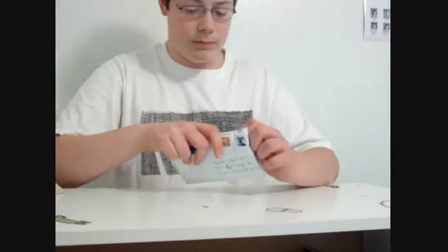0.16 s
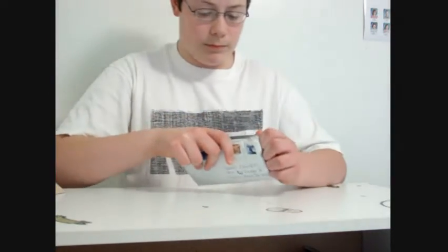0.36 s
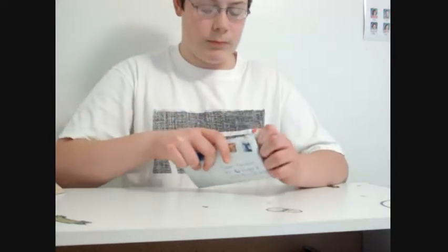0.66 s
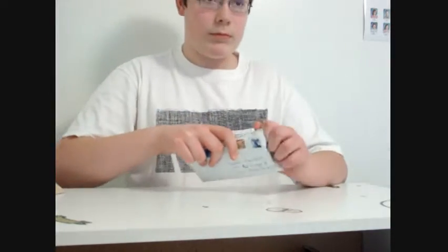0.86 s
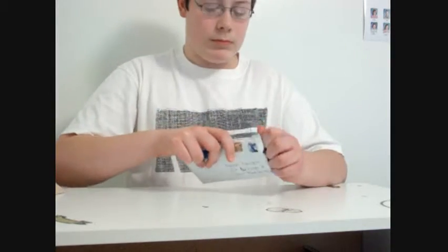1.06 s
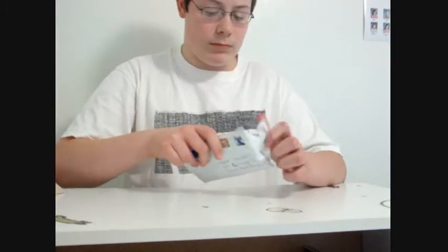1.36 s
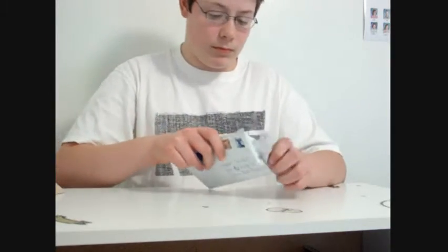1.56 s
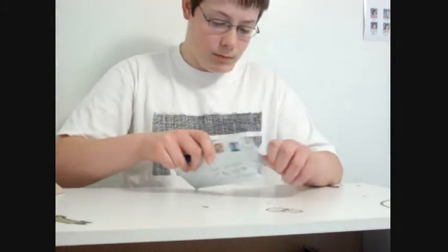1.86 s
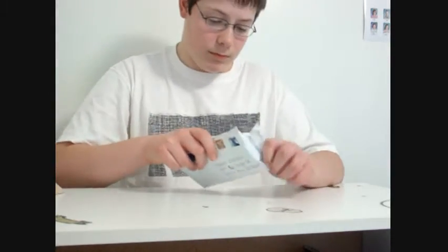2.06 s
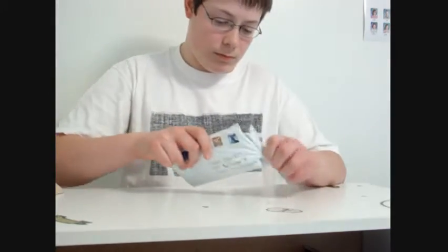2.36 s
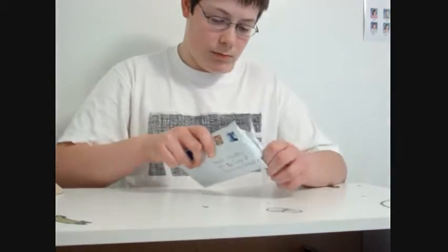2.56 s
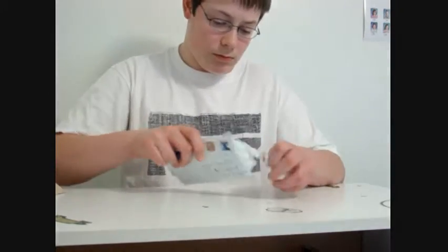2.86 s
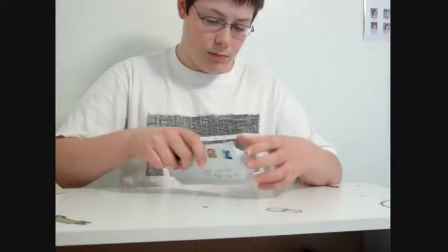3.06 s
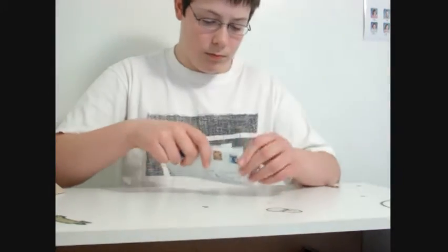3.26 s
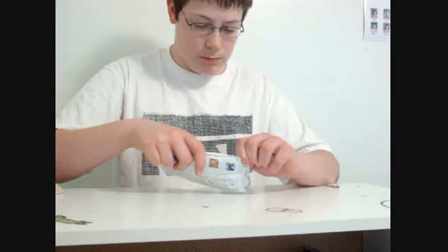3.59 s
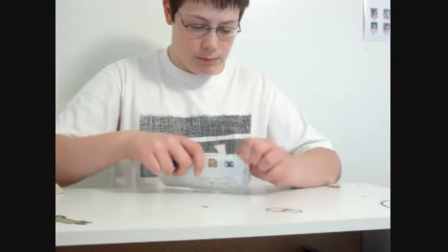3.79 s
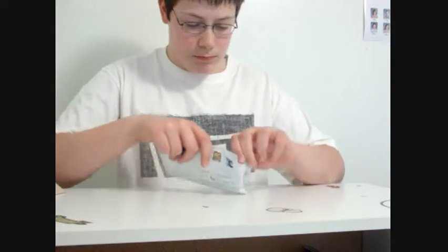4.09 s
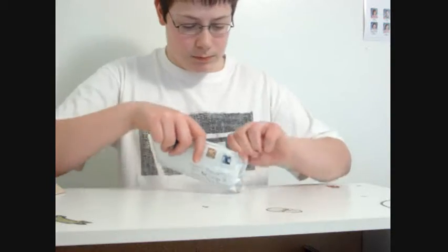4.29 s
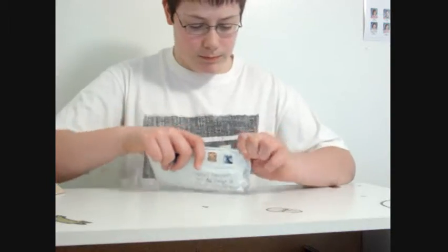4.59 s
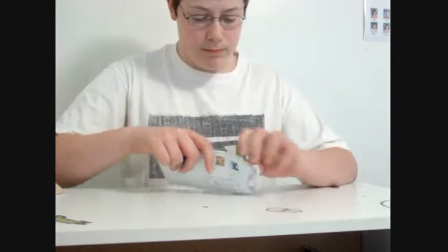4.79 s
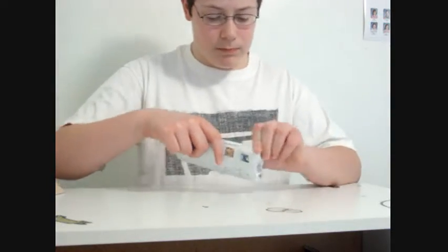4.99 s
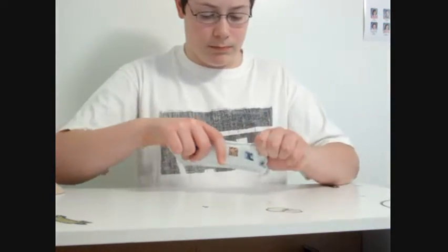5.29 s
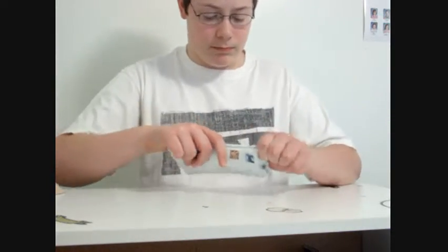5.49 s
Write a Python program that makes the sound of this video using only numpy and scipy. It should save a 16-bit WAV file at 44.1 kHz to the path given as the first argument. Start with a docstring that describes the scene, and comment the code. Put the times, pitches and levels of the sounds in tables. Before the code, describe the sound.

Close paper crackling, one quick sharp tear of an envelope, then more rustling, snaps and soft pops in a quiet room.

```python
"""A small quiet room, a stiff paper envelope worked open above a desk, close to a small microphone.
First the paper creases and snaps as it buckles in the hands, and its wide panels flip with a pop.
At 1.2 s one short loud rip of parting fibres takes the end off; its sharpest snaps hit the limiter hard.
A fingertip squeaks, then fingers rustle in the pocket and tug at the contents, with more snaps and pops.
The desk and near walls answer throughout, over a faint hush; the narrow band ends near 10 kHz."""
import sys
import numpy as np
from scipy import signal
from scipy.fft import rfft, irfft, next_fast_len
from scipy.io import wavfile
from scipy.ndimage import uniform_filter1d, minimum_filter1d, map_coordinates

SR = 44100
rng = np.random.default_rng(int(sys.argv[2]) if len(sys.argv) > 2 else 0)


def store_wav(level_fs):
    """Save 16-bit WAV to argv[1]."""
    pcm = np.round(np.clip(np.atleast_2d(level_fs), -1, 1) * 32767)
    wavfile.write(sys.argv[1], SR, pcm.T.astype(np.int16))


N = 248724

# All levels are relative; brightness is the level of the fibres over that of the sheet's body.
# The tear running along the fold. Each row: time in seconds, force in dB, brightness in dB.
TEAR = [(1.187, -48, 0), (1.194, -23, -2), (1.212, -16.5, 2), (1.228, -13, 4), (1.241, -10, -3),
        (1.257, -11.5, -2), (1.277, -17.5, -2), (1.287, -30, -4), (1.31, -48, -4)]
# The sheet ringing as it tears. Each row: frequency in Hz, width in Hz, level in dB.
SHEET_MODES = [(600, 90, -11), (860, 80, -8), (1380, 70, 0), (1630, 90, -1), (1860, 110, -1),
               (2240, 120, -4), (2840, 110, -6), (3080, 90, -5), (3380, 90, -6), (3730, 110, -8)]
# Paper buckling. Each row: time in seconds, tick, crackle and brightness in dB, crackle t60 in seconds.
BUCKLES = [(0.0873, -18.5, -24.5, 7, 0.12), (.12, -38, -32, 4, 0.2), (0.189, -40, -22, 2, .12),
           (0.329, -19.5, -29.5, 4, 0.086), (.394, -31.5, -34, 5.5, 0.1), (.468, -45, -36, 17, 0.045),
           (.559, -17.5, -24.5, 9, 0.11), (.866, -45, -32.5, -6, 0.034), (.926, -21, -30.5, 3, 0.15),
           (1.116, -29, -30, 15, 0.081), (1.1997, 7, -12, -1, 0.051), (1.206, -3.5, -28, -6, 0.034),
           (1.2175, 16.5, -26, 11, 0.017), (1.3616, -20.5, -25, 4.5, 0.057),
           (1.4678, -16.5, -23, -2.5, 0.058), (1.61, -50, -31, 4, 0.17), (1.752, -48, -35.5, -10, 0.033),
           (1.82, -25, -14, 16, 0.036), (1.848, -39, -20.5, 14, 0.08), (1.901, -18.5, -18, 1.5, 0.075),
           (1.908, -15, -12, 9, 0.1), (1.988, -45, -28.5, 2, 0.032), (2.015, -40, -15, 8, 0.066),
           (2.179, -44, -29.5, 3, 0.23), (2.206, -21, -23.5, 3, .1), (2.276, -45, -23.5, 4.5, 0.16),
           (2.423, -38, -27.5, 14, 0.082), (2.556, -29, -29, 1.5, 0.079), (2.687, -24, -29.5, -4.5, 0.066),
           (2.714, -35, -26, -1.5, 0.13), (2.764, -38, -33, 5, 0.26), (2.895, -18, -15, 6.5, 0.13),
           (3.424, -44, -22.5, 2, 0.037), (3.447, -37, -22.5, 13, 0.078), (3.669, -15.5, -13.5, -8, 0.031),
           (3.751, -31.5, -40, -1, 0.3), (3.819, -35, -32, 5.5, 0.14), (3.96, -35, -25, 18, 0.065),
           (4.105, -50, -28.5, -4, 0.079), (4.129, -22, -31.5, 1.5, 0.25), (4.31, -15, -19.5, -5.5, 0.067),
           (4.333, -37, -24.5, -2, 0.13), (4.584, -38, -35.5, 0, 0.13), (5.184, -32, -28, -1, 0.046),
           (5.223, -31, -32, 1.5, 0.084), (5.316, -27, -26.5, 20, .055), (5.423, -29, -13, -1, 0.037),
           (5.428, -12.5, -18, -2.5, 0.14), (5.494, -45, -28, 4, 0.025), (5.536, -30, -18.5, 1.5, 0.053),
           (5.583, -17, -23.5, -5.5, 0.065), (5.632, -19, -22.5, 1, 0.19)]
# A wide panel of the envelope flipping. Each row: time in seconds, level in dB, pitch in Hz.
PANEL_FLIPS = [(.188, -33.5, 550), (0.559, -45, 706), (.824, -45, 530), (.866, -39.5, 603),
               (1.467, -30.5, 476), (1.821, -33, 807), (1.848, -35.5, 740), (1.902, -27.5, 722),
               (2.0094, -30, 636), (2.202, -32.5, 470), (2.556, -36, 860), (2.898, -39.5, 379),
               (3.422, -28, 856), (3.669, -38, 513), (5.425, -28, 794), (5.536, -31, 754),
               (5.583, -24.5, 760), (5.632, -32, 443)]
# The flipped panel ringing. Each row: multiple of its pitch, level in dB, t60 in seconds.
PANEL_MODES = [(.72, -19.5, 0.14), (1, 4, 0.077), (1.47, -10.5, 0.026), (2.1, -2, 0.051)]
# Hands sliding paper on paper. Each row: start and length in seconds, level and brightness in dB.
STROKES = [(0.048, 0.019, -36.5, -0.5), (0.809, 0.021, -40, -1), (0.944, 0.029, -40.5, 0),
           (1.025, 0.17, -49, -5), (1.395, 0.093, -45, 5), (1.65, 0.3, -42, 1), (1.824, 0.016, -34.5, -12),
           (2.264, 0.13, -34, -4), (2.506, 0.1, -40, 0.5), (2.927, .22, -42.5, 2.5), (3.299, 0.2, -42, 8.5),
           (3.395, .02, -44.5, 10), (3.524, .15, -35, -1), (3.944, .02, -44, 5), (4.048, 0.24, -42, 2),
           (4.416, 0.073, -50, 15), (4.625, .14, -50.5, 4.5), (4.751, 0.14, -44, 3.5),
           (4.885, 0.37, -36.5, 1), (5.306, 0.13, -41.5, 0)]
# The hands keep still and the rub fades. Each row: start and end in seconds, level change in dB.
PAUSES = [(0.245, 0.327, -2.5), (0.616, 0.778, -7), (1.54, 1.563, -15), (2.084, 2.136, -4),
          (3.19, 3.297, -1)]
# Fingertips scraping the paper. Each row: centre and half length in seconds, level in dB, pitch in Hz.
SCRAPES = [(.546, 0.003, -34, 2270), (1.089, 0.0078, -39.5, 1700), (1.62, 0.014, -44, 1670),
           (1.71, 0.0077, -33.5, 2000), (2.905, .008, -18.5, 3770), (2.42, 0.019, -37.5, 890),
           (3.414, 0.005, -46, 1500), (4.218, 0.011, -38, 1570), (4.283, 0.016, -40, 2300),
           (4.505, 0.0044, -36.5, 2550), (5.527, 0.0034, -31, 2980)]
# Hands and forearms bumping envelope and desk. Each row: as for the scrapes.
BUMPS = [(.198, 0.022, -43, 474), (1.222, 0.0062, -27, 178), (1.473, 0.017, -35, 420),
         (2.39, 0.082, -54.5, 80), (3.57, 0.059, -42, 445), (3.674, 0.0039, -21.5, 481),
         (5.39, 0.026, -45.5, 196), (5.435, 0.011, -45, 202), (5.49, 0.039, -40, 408)]
# A fingertip squeaking. One row: as for the scrapes.
SQUEAK = (1.619, .011, -33, 835)
# Spectra of flexing sheet, snapping fibres, hollow pocket and quiet room.
# Each row: frequency in Hz, level in dB.
BODY_SPECTRUM = [(60, -26), (180, -23), (290, -28), (430, -8), (1000, -5), (1400, 1), (1900, 3),
                 (2800, -5.5), (4000, -4.5), (6000, -29), (10000, -31)]
FIBRE_SPECTRUM = [(200, -37), (1200, -36), (2500, 1.5), (3700, 0), (5200, 1), (7500, 1.5), (10000, -2.5)]
POCKET_SPECTRUM = [(60, -4), (180, -6), (280, -2.5), (430, 4), (700, 3.5), (1000, 3.5), (2000, -15),
                   (8000, -79.5)]
HUSH_SPECTRUM = [(15, -64), (25, -24), (97, 4), (148, -2), (195, 7), (305, -1), (467, 5), (942, -17),
                 (1440, -14), (1630, -7.5), (4670, -9), (8310, -30), (9900, -30), (12900, -24),
                 (21800, -120)]
# Decay off the desk and near walls. Each row: frequency in Hz, t60 in seconds.
ROOM_DECAY = [(150, 0.26), (500, 0.22), (2000, 0.3), (9000, 0.13)]

STRAIN_S = 0.0021  # strain builds before the paper gives
HOLD_DB, HOLD_BRIGHT_DB = -51.5, 5  # the faint rub of paper that is only held
TOP_HZ = 10350  # top of the recorder's band


def rip(ring_db=-9, snaps_db=1, puff_db=-25, puff_hz=45, puff_s=0.011):
    """Fibres part in a dense run and ring the sheet; the jerk puffs air at the microphone."""
    now = np.arange(N) / SR
    times, force_db, bright_db = np.transpose(TEAR)
    force = amp(np.interp(now, times, force_db)) * (now > times[0]) * (now < times[-1])
    dull, sharp = shares(np.interp(now, times, bright_db))
    parting = lambda: force * grains(rate=9000, spread_db=2.5)
    hz = np.fft.rfftfreq(SR // 4, 1 / SR)
    modes = irfft(sum((-1) ** k * amp(db) * 1j * hz * width / (centre ** 2 - hz ** 2 + 1j * hz * width)
                      for k, (centre, width, db) in enumerate(SHEET_MODES)))
    ring = signal.fftconvolve(dull * parting(), modes / np.linalg.norm(modes))[:N]
    flex = coloured(dull * parting(), BODY_SPECTRUM)
    snaps = coloured(sharp * parting(), FIBRE_SPECTRUM)
    air = unit(signal.sosfilt(signal.butter(2, puff_hz, fs=SR, output="sos"), rng.standard_normal(N)))
    lag = np.exp(-1 / (puff_s * SR))
    gust = signal.lfilter([1 - lag], [1, -lag], force)
    return amp(ring_db) * ring + flex + amp(snaps_db) * snaps + amp(puff_db) * gust * air


def creases(tick_db=5, tick_s=.00045, body_db=1, fibre_db=-1, facet_db=1, hollow_db=-18):
    """Each buckle strains, gives with a tick and sheds dying crackles that stir the pocket."""
    body, fibres, hollow = np.zeros((3, N))
    t = np.arange(-SR // 16, SR // 4) / SR
    tick_decay = (t >= 0) * np.exp(-np.maximum(t, 0) / tick_s)
    for s, tick, crackle, bright, t60 in BUCKLES:
        # a brighter buckle gives sooner and flips a smaller, higher facet
        rise_s = STRAIN_S / 2 ** (bright / 5.5)
        facet_hz = np.clip(3500 * 2 ** (bright / 4.5), 1150, 8500)
        dying = amp(crackle) * buckle_shape(t, rise_s, t60)
        for track, share, db in zip((body, fibres), shares(bright), (body_db, fibre_db)):
            snap = amp(tick + tick_db) * tick_decay * rng.choice([-1, 1], len(t))
            facet = amp(facet_db) * resonance(snap, facet_hz, q=4)
            crackles = amp(db) * dying * grains(rate=6000, spread_db=5, size=len(t))
            add(track, s + t[0], share * (snap + facet + crackles))
        add(hollow, s + t[0], amp(hollow_db) * dying * grains(rate=6000, spread_db=9, size=len(t)))
    sheet = coloured(body, BODY_SPECTRUM) + coloured(fibres, FIBRE_SPECTRUM)
    return sheet + coloured(hollow, POCKET_SPECTRUM)


def pops(ring_db=-1, flutter_db=-1, hollow_db=-6, attack_s=.0015, settle_t60_s=0.13, scatter_db=1.5):
    """A wide panel flips, flutters around its pitch, drives the air in the pocket and rings briefly."""
    hollow, panels = np.zeros((2, N))
    t = np.arange(-SR // 16, SR // 4) / SR
    age = np.maximum(t, 0)
    attack = 1 - np.exp(-age / attack_s)
    for s, pop_db, hz in PANEL_FLIPS:
        dying = amp(pop_db) * buckle_shape(t, STRAIN_S, settle_t60_s)
        drive = grains(rate=6000, spread_db=1, size=len(t))
        flutter = unit(resonance(resonance(drive, hz, q=1.1), hz, q=1.1))
        ring = sum(amp(db + rng.normal(0, scatter_db) - 60 * age / t60)
                   * np.sin(2 * np.pi * hz * ratio * age) for ratio, db, t60 in PANEL_MODES)
        add(hollow, s + t[0], amp(hollow_db) * dying * drive)
        add(panels, s + t[0], amp(flutter_db) * dying * flutter + amp(pop_db + ring_db) * ring * attack)
    return coloured(hollow, POCKET_SPECTRUM) + panels


def buckle_shape(t, rise_s, t60, strain_db=-7, flex_db=-21, flex_s=0.012):
    """Gain through a buckle: the sheet flexes, strain builds up to time 0, then the crackle dies."""
    before = np.minimum(t, 0)
    strain = amp(flex_db) * np.exp(before / flex_s) + amp(strain_db) * np.exp(before / rise_s)
    return np.where(t >= 0, amp(-60 * np.maximum(t, 0) / t60), strain)


def rustle(rub_db=-1, hollow_db=-4, slip_s=0.0031, uneven_db=2.5, tick_db=-4):
    """Sliding paper catches and slips: clumps of grains on an uneven rub, with stray ticks."""
    body, fibres = sliding() * amp(uneven_db * wobble(rate=28))
    # the pocket's hollow sound swells less than the rub that drives it
    hollow = amp(HOLD_DB + hollow_db) * (np.hypot(body, fibres) / amp(HOLD_DB)) ** 0.54
    slip_starts = np.abs(grains(rate=160, spread_db=8))
    slips = signal.lfilter([1], [1, -np.exp(-1 / (slip_s * SR))], slip_starts)
    catch = unit(1 + .5 * unit(slips))
    ticks = amp(tick_db) * grains(rate=130, spread_db=2)
    hiss = coloured(fibres * (catch * grains(rate=4400, spread_db=1.5) + ticks), FIBRE_SPECTRUM)
    flex = coloured(body * (catch * grains(rate=3000, spread_db=0.5) + ticks), BODY_SPECTRUM)
    pocket = coloured(hollow * grains(rate=2800, spread_db=2), POCKET_SPECTRUM)
    return amp(rub_db) * (hiss + flex) + pocket


def sliding(attack_s=0.0076, sag_db_per_s=11.5, release_db_per_s=235):
    """Gains of body and fibres: each stroke starts quickly, sags and fades into the rub of holding."""
    now = np.arange(N) / SR
    rest_db = sum(db * ((now > start) & (now < end)) for start, end, db in PAUSES)
    held = amp(HOLD_DB + uniform_filter1d(1. * rest_db, size=1000))
    power = np.outer(shares(HOLD_BRIGHT_DB), held) ** 2
    for s, length, db, bright in STROKES:
        age = np.maximum(now - s, 0)
        fade_db = sag_db_per_s * age + release_db_per_s * np.maximum(age - length, 0)
        stroke = amp(db - fade_db) * np.minimum(age / attack_s, 1)
        power += np.outer(shares(bright), stroke) ** 2
    return np.sqrt(power)


def bending(x, treble_db=2):
    """As the sheet bends its resonances wander, shifting the crackle's colour, most in the treble."""
    spectra = signal.stft(x, nperseg=256)[2]
    wander = uniform_filter1d(rng.standard_normal(spectra.shape), size=6, axis=0)
    wander = unit(uniform_filter1d(wander, size=5, axis=1))
    depth_db = treble_db * np.minimum(np.fft.rfftfreq(256, 1 / SR) / 3000, 1)[:, None]
    return signal.istft(spectra * amp(depth_db * wander), nperseg=256)[1][:N]


def touches(rows, q):
    """Brief swells of friction, each in one resonance of the thing touched."""
    track = np.zeros(N)
    t = np.arange(-SR // 8, SR // 4) / SR
    for s, half_length, db, hz in rows:
        swell = np.exp(-(t / half_length) ** 2)
        rub = resonance(resonance(rng.standard_normal(len(t)), hz, q), hz, q)
        add(track, s + t[0], amp(db) * unit(swell * rub) * np.sqrt(np.mean(swell ** 2)))
    return track


def squeak(second_db=1, third_db=-9, roughness=0.017):
    """A fingertip sticks and slips on the paper: a short rough chirp of three harmonics."""
    s, half_length, db, hz = SQUEAK
    waver = unit(uniform_filter1d(rng.standard_normal(N), size=90))
    phase = 2 * np.pi * np.cumsum(hz * (1 + roughness * waver)) / SR
    tone = np.sin(phase) + amp(second_db) * np.sin(2 * phase) + amp(third_db) * np.sin(3 * phase)
    swell = np.exp(-((np.arange(N) / SR - s) / half_length) ** 2)
    return amp(db) * swell * unit(tone)


def room(x, wet_db=-15.5, positions=19):
    """The desk and the near walls answer; their pattern changes as the envelope moves."""
    place = np.linspace(0, positions - 1, N)
    wet = np.zeros(N)
    for k in range(positions):
        crossfade = np.sqrt(np.maximum(1 - abs(place - k), 0))
        wet += signal.oaconvolve(x * crossfade, room_tail())[:N]
    return x + amp(wet_db) * wet


def room_tail(onset_s=0.00021):
    """Diffuse reflections of energy 1 whose treble dies first."""
    hz, t, spectra = signal.stft(rng.standard_normal(SR // 3), SR, nperseg=256)
    decay = amp(-60 * t / along(ROOM_DECAY, hz)[:, None])
    echo = signal.istft(spectra * decay, SR, nperseg=256)[1]
    echo *= 1 - np.exp(-np.arange(len(echo)) / SR / onset_s)
    return echo / np.linalg.norm(echo)


def hush():
    """Room tone: the steady noise of the quiet room."""
    return coloured(rng.standard_normal(N), HUSH_SPECTRUM)


def grains(rate, spread_db, size=N):
    """Tiny impulses of uneven size at random moments, about rate a second; rms 1."""
    strength = amp(spread_db * np.minimum(rng.exponential(size=size), np.pi))
    return unit((rng.random(size) < rate / SR) * strength * rng.choice([-1, 1], size))


def shares(bright_db):
    """Splits a unit of power into gains for the sheet's body and its fibres."""
    ratio = amp(bright_db)
    return 1 / np.hypot(1, ratio), ratio / np.hypot(1, ratio)


def coloured(x, spectrum, size=4096):
    """x through a causal filter that keeps the power of white noise within the recorder's band."""
    hz = np.fft.rfftfreq(size, 1 / SR)
    gain = amp(along(spectrum, hz))
    gain /= np.sqrt(np.mean(gain ** 2 * (hz < TOP_HZ)))
    # minimum phase, so nothing rings ahead of a tick
    cepstrum = irfft(np.log(gain))
    cepstrum[1:size // 2] *= 2
    cepstrum[size // 2 + 1:] = 0
    return signal.fftconvolve(x, irfft(np.exp(rfft(cepstrum))))[:N]


def resonance(x, hz, q):
    """x through one resonance of gain 1; q is pitch over width."""
    return signal.lfilter(*signal.iirpeak(hz, q, SR), x)


def wobble(rate):
    """A smooth random curve, rate knots a second."""
    return map_coordinates(rng.standard_normal(N // 100), [np.arange(N) * rate / SR], mode="wrap")


def along(points, hz):
    """Reads rows of frequency and value on a log frequency axis."""
    knots_hz, values = np.transpose(points)
    return np.interp(np.log(hz + 1), np.log(knots_hz), values)


def add(track, s, sound):
    """Mixes a sound into a track from s seconds on."""
    start = max(0, round(s * SR))
    part = track[start:start + len(sound)]
    part += sound[:len(part)]


def amp(db):
    """Decibels to gain."""
    return 10 ** (np.asarray(db) / 20)


def unit(x):
    """Scaled to rms 1."""
    return x / np.sqrt(np.mean(x ** 2) + 1e-20)


def band_limited(x, edge_hz=600):
    """The treble falls steeply to nothing at the top of the recorder's band."""
    size = next_fast_len(N + SR // 4)
    edge = np.clip((TOP_HZ - np.fft.rfftfreq(size, 1 / SR)) / edge_hz, 0, 1)
    return irfft(rfft(x, size) * np.sin(np.pi / 2 * edge) ** 2, size)[..., :N]


def scene(paper_db=-1, hush_db=-53):
    """At the microphone, in mono: paper and hands close by, faint room tone behind."""
    hands = touches(SCRAPES, q=1.4) + touches(BUMPS, q=2.9)
    crackle = bending(creases() + pops() + rustle())
    paper = room(crackle + rip() + squeak() + hands)
    return (amp(paper_db) * paper + amp(hush_db) * hush())[None]


def record(dry):
    """The narrow-band recorder holds the highest peaks down with a fast limiter."""
    x = band_limited(dry)
    needed_gain = np.minimum(1, .95 / (np.abs(x) + 1e-9))
    smooth_gain = uniform_filter1d(minimum_filter1d(needed_gain, size=25), size=25)
    return band_limited(x * smooth_gain)


dry = scene()
out = record(dry)
store_wav(out)
```